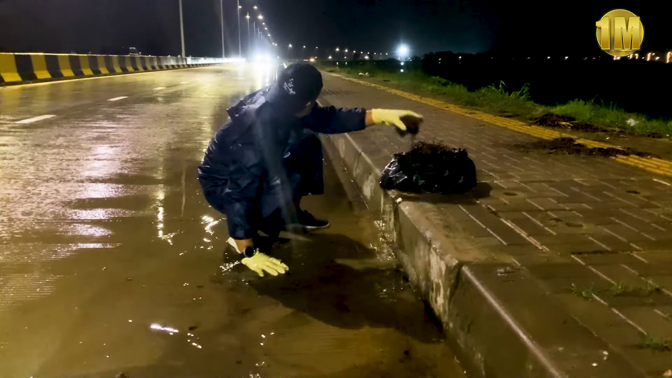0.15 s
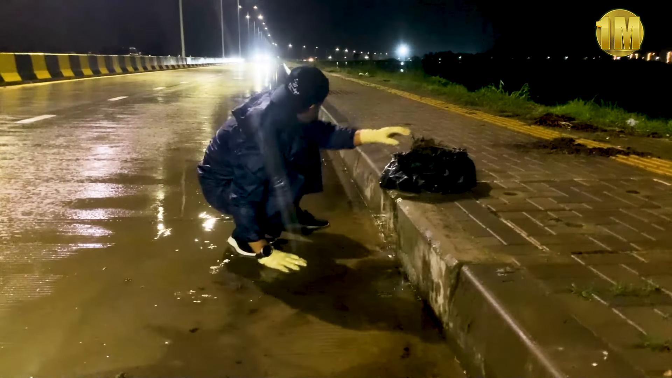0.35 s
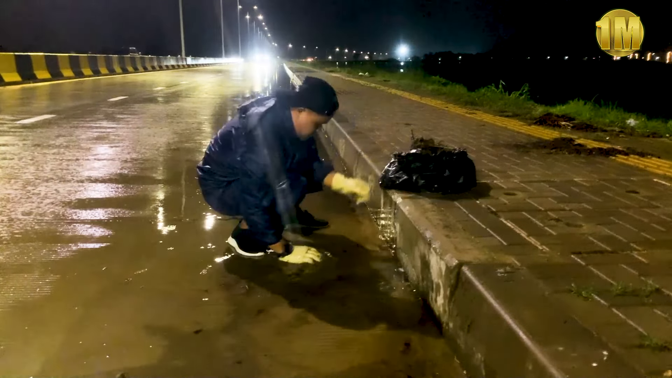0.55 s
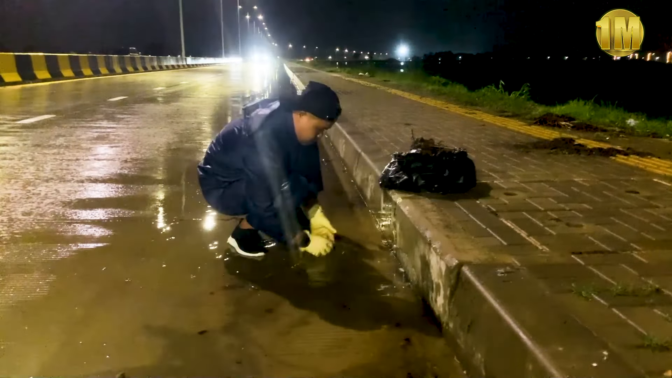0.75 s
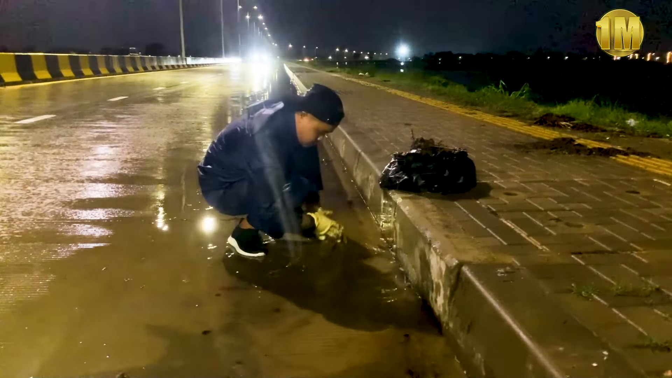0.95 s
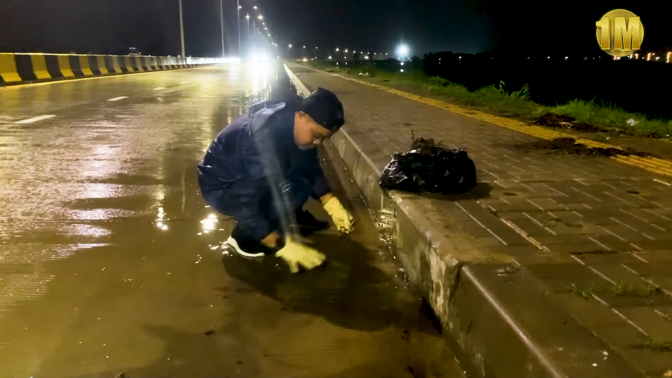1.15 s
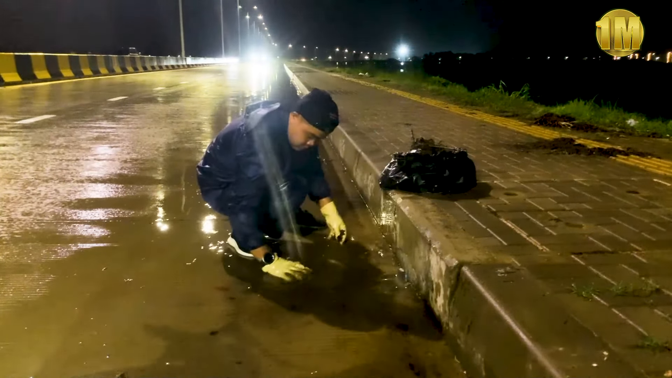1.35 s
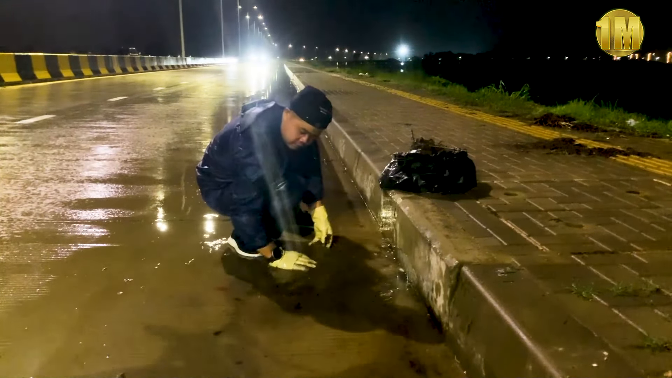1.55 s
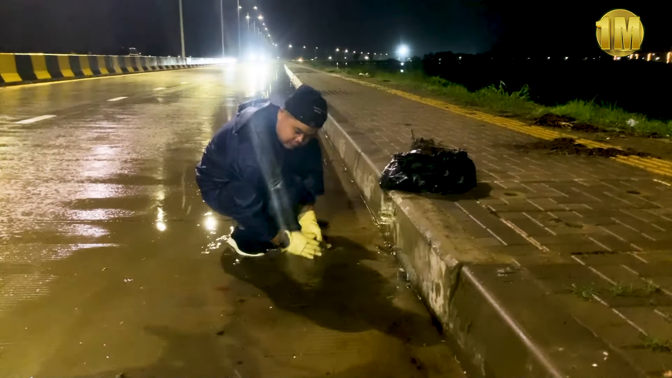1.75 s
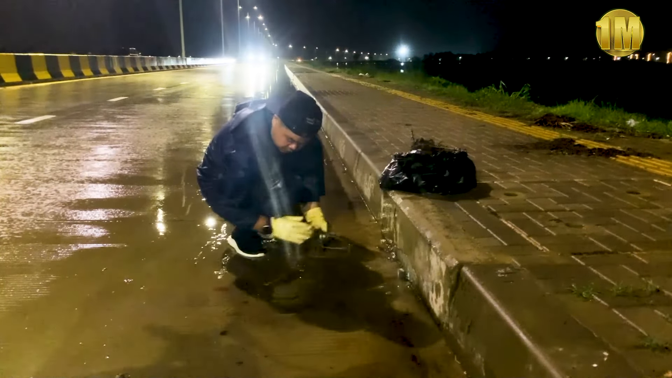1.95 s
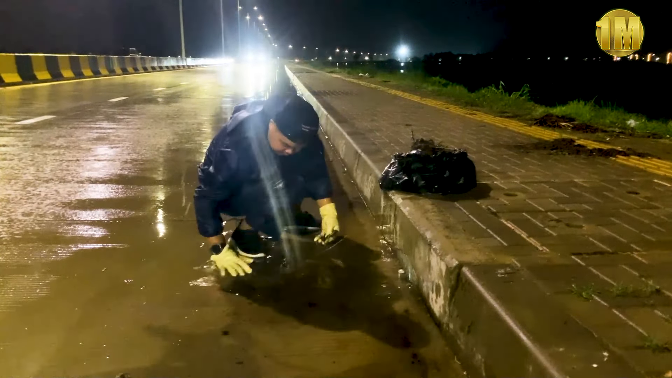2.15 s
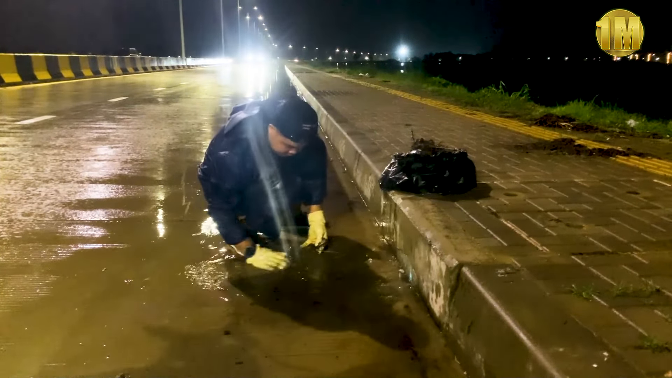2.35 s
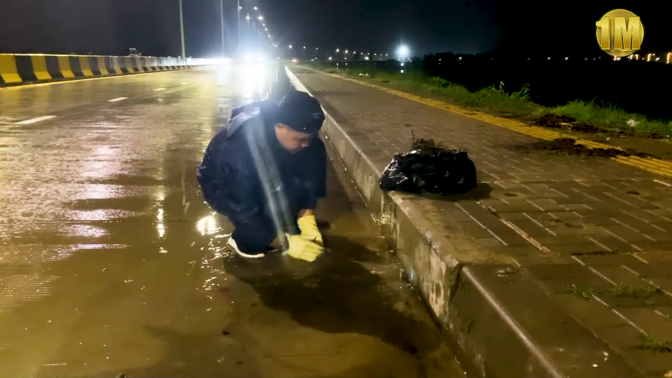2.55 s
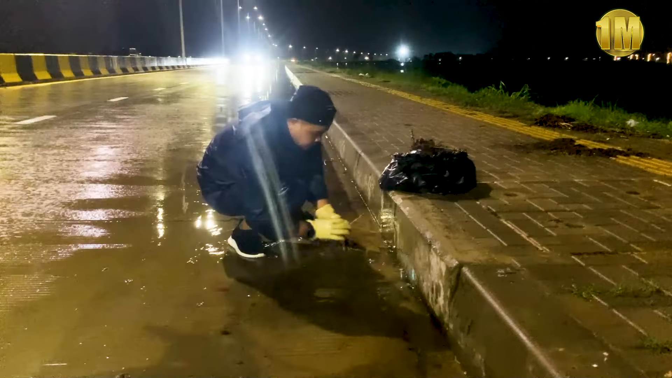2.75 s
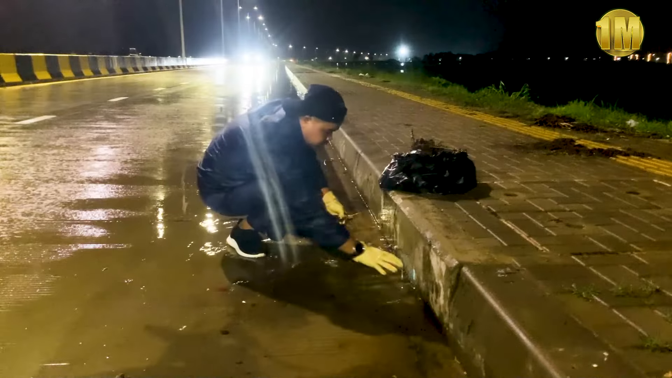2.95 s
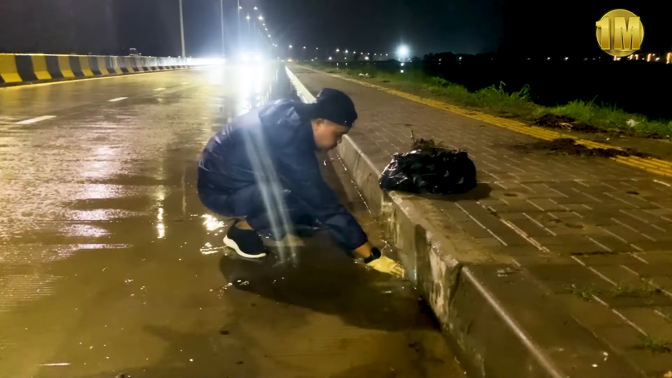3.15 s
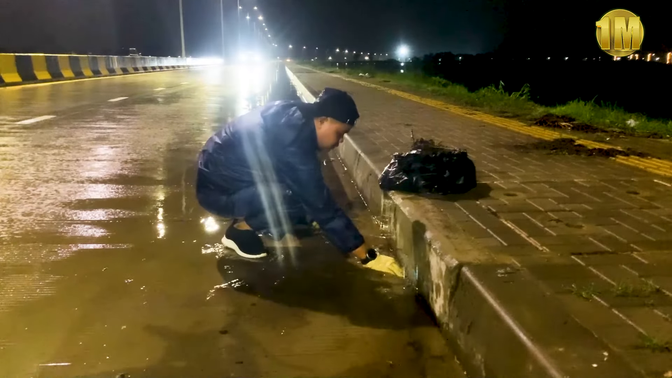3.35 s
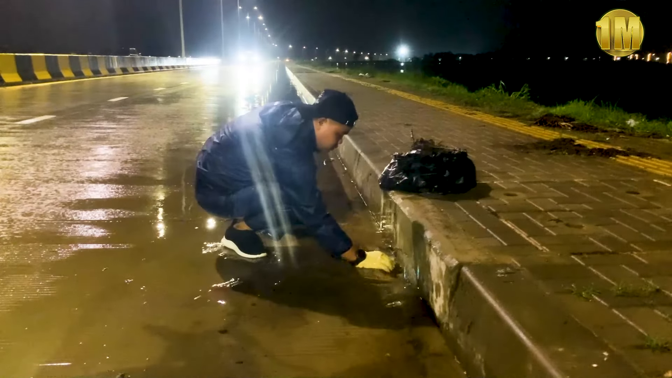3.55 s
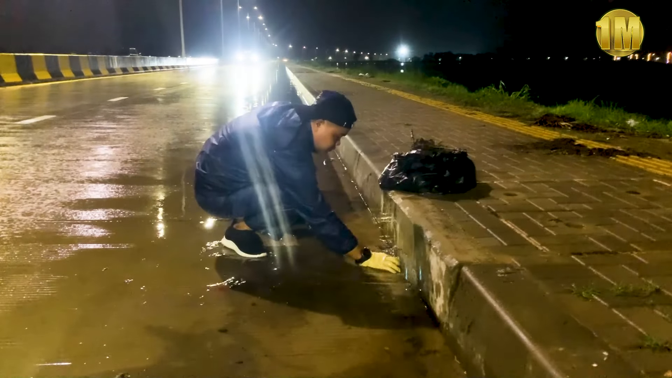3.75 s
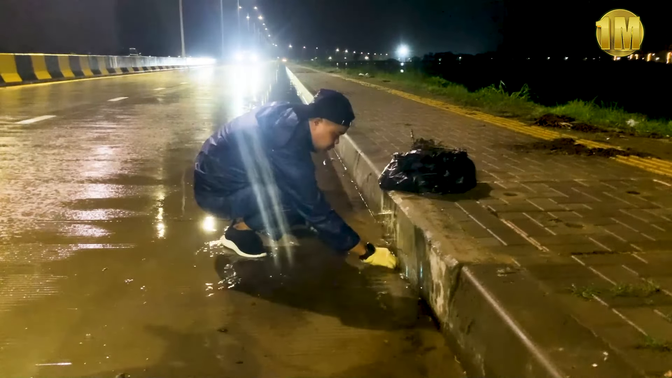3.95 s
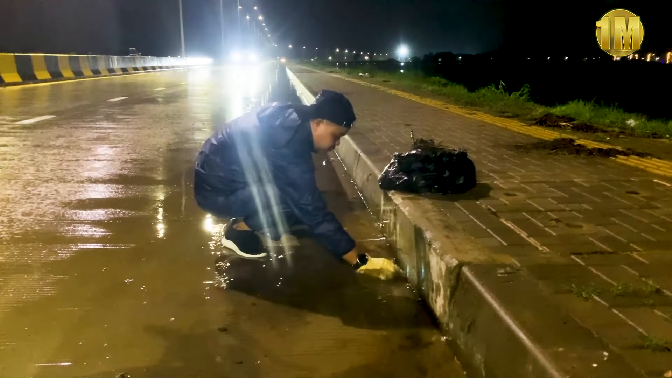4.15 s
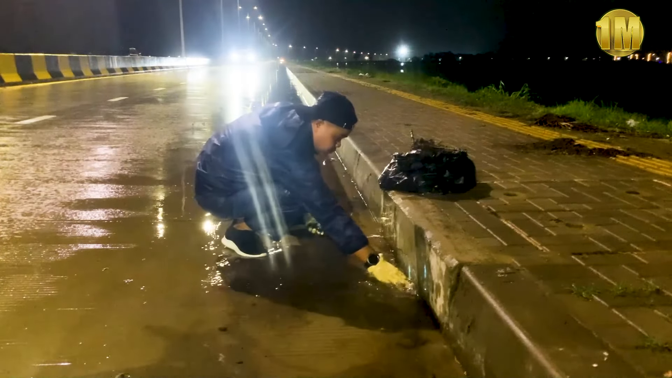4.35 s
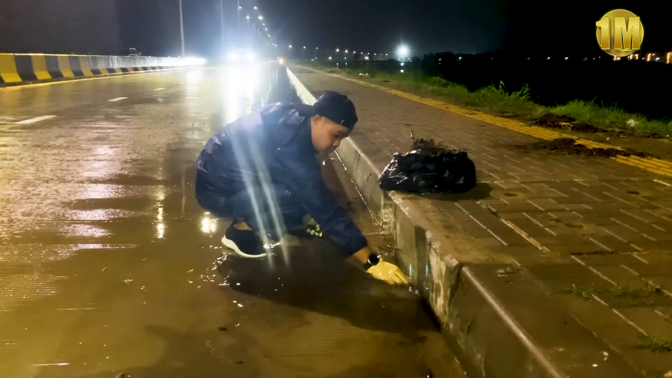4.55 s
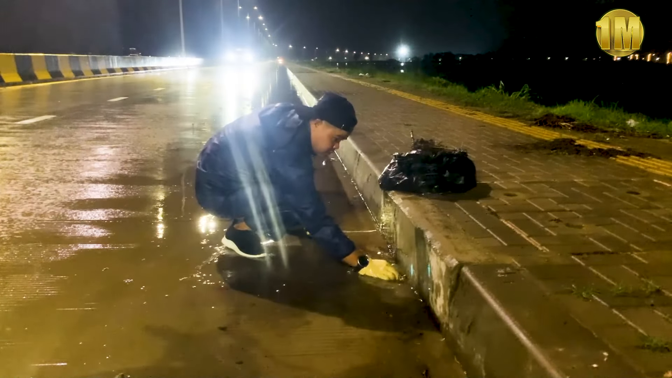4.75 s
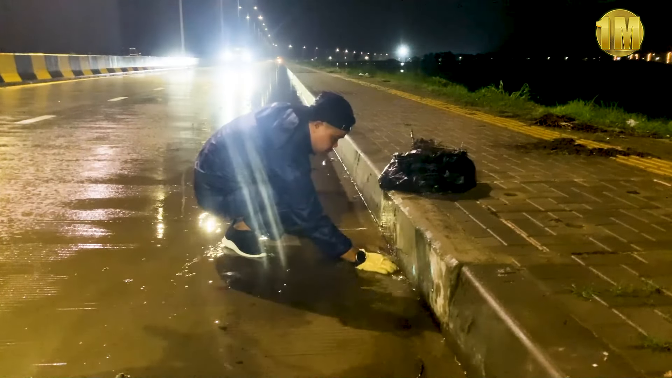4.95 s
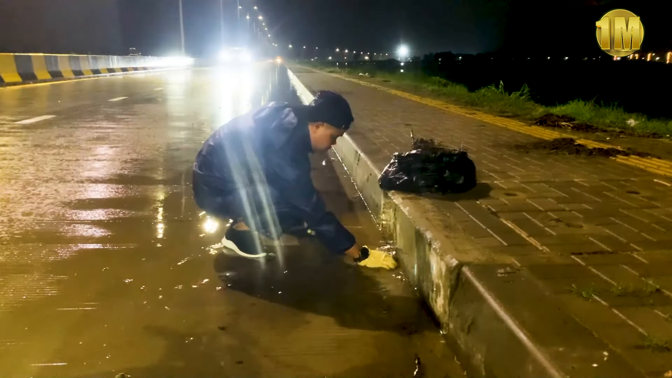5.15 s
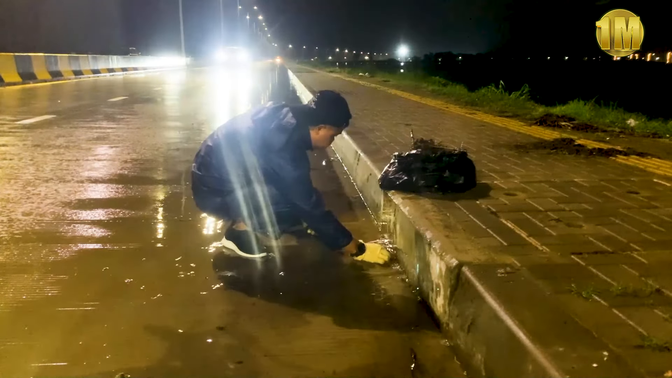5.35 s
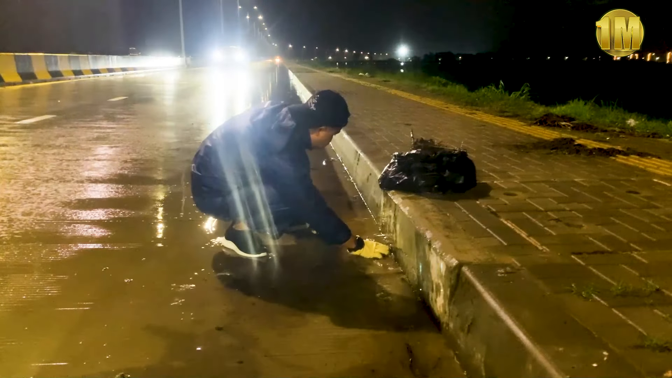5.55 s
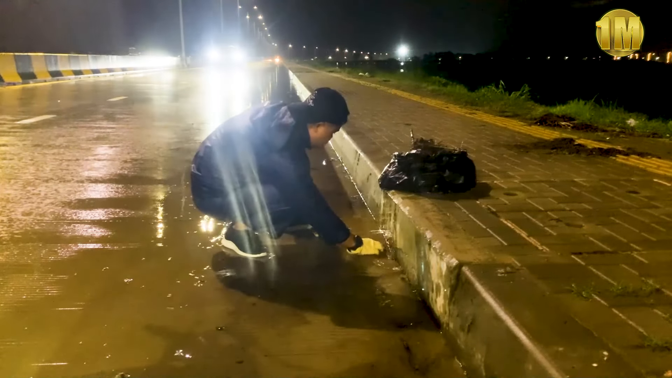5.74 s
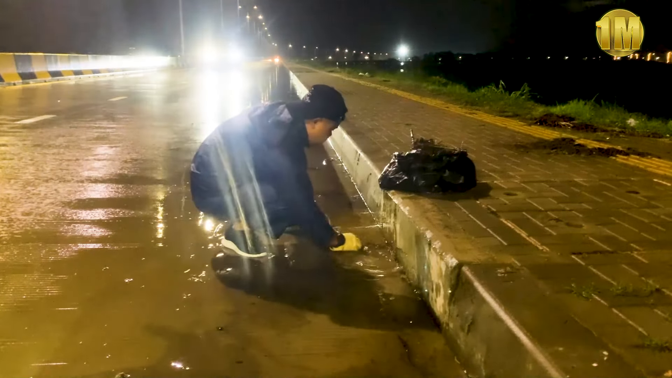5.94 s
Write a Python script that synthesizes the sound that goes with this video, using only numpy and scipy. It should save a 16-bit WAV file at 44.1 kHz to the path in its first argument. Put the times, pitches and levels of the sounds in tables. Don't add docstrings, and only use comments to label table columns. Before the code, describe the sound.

Outdoors on a wet roadside at night, a far engine hum sags and fades as another car's deep throbbing rumble stays low, then swells strongly after four seconds. Close to the microphone, grit clicks, drips, soft cloth rubs and dull drain knocks come irregularly, one knock standing out before the car grows loud. Thin tyre hiss and spray lie beneath. Stereo pickup is slightly ragged from noise reduction.

```python
import sys
import numpy as np
from scipy import signal
from scipy.fft import rfft, irfft, next_fast_len
from scipy.io import wavfile
from scipy.ndimage import uniform_filter1d, map_coordinates

SR = 44100
rng = np.random.default_rng(int(sys.argv[2]) if len(sys.argv) > 2 else 0)


def to_wav(sig):
    pcm = np.clip(np.atleast_2d(sig), -1, 1) * 32767
    pcm = np.round(pcm).astype(np.int16)
    wavfile.write(sys.argv[1], SR, pcm.T)


def amplitude_ratio(level_db):
    exponent = np.asarray(level_db, float) / 20
    return 10 ** exponent


N = 268683


def unit(x):
    return x / np.sqrt(np.mean(x ** 2) + 1e-20)


def along(points, hz):
    f, v = np.transpose(points)
    return np.interp(np.log(hz + 1), np.log(f + 1), v)


def wobble(rate):
    return map_coordinates(rng.standard_normal(800), [np.arange(N) * min(rate, 120) / SR])


def filtered(x, response):
    m = next_fast_len(N + 8192)
    return irfft(rfft(x, m) * response(np.fft.rfftfreq(m, 1 / SR)), m)[..., :N]


# (frequency [Hz], common share [0-1])
ALIKE = [(60, .97), (350, .92), (540, .74), (700, .85), (900, .6), (1500, .9), (1700, .65), (2400, .88),
         (2650, .55), (2900, .85), (3250, .7), (3600, .33), (11500, .3), (13000, .95)]


def rush(spectrum, patchy_db):
    z = signal.stft(rng.standard_normal((2, N)), nperseg=512)[2]
    field = uniform_filter1d(rng.standard_normal(z.shape[1:]), size=5, axis=0)
    field = uniform_filter1d(field, size=12, axis=1)
    pair = signal.istft(z * amplitude_ratio(patchy_db * unit(field)), nperseg=512)[1][:, :N]

    def split(hz):
        angle = np.arccos(np.clip(along(ALIKE, hz), 0, 1)) / 2
        return amplitude_ratio(along(spectrum, hz)) * [np.cos(angle), np.sin(angle)]

    common, diffuse = filtered(pair, split)
    return unit(np.array([common + diffuse, common - diffuse]))


# (time [s], level [dB])
CAR = [(0, -33.5), (.4, -38.5), (1.5, -39.5), (2.4, -38), (3.1, -37.5), (3.8, -37), (4.3, -33),
       (4.7, -29.5), (5.1, -29.5), (5.4, -22), (5.8, -24.5), (6.09, -27.5)]


def nearness():
    far_db = -39
    s, level_db = np.transpose(CAR)
    return np.interp(np.arange(N) / SR, s, level_db) - far_db


# (frequency [Hz], density [dB per Hz])
BOOM = [(35, -120), (52, -37), (66, 3.2), (80, -1), (100, -0.5), (125, -2.5), (165, -13), (230, -24.5),
        (400, -120)]
# (frequency [Hz], density [dB per Hz])
GROWL = [(60, -120), (110, -29), (165, 1), (250, -6), (340, -11.5), (430, -24), (540, -33), (900, -120)]
# (frequency [Hz], density [dB per Hz])
GROUND = [(18, -64), (30, -35), (40, -24), (52, -12.5), (62, -12.5), (80, -10.5), (120, -120)]
# (frequency [Hz], density [dB per Hz])
WHINE = [(900, -120), (1150, -33), (1270, 12), (1330, 10.5), (1700, -120)]
# (time [s], half length [s], boom change
# [dB], growl change [dB])
JOLTS = [(0.143, 0.065, -12.5, -4.5), (0.28, .05, -3.5, 4.5), (.58, 0.024, 4, 3), (1.31, 0.044, 0.5, 3),
         (1.785, 0.043, -4, -0.5), (2.01, 0.033, 3, .1), (2.883, 0.033, 2, -1.5), (3.03, 0.01, 0, 1),
         (3.774, 0.022, 4, 0.6), (4.346, 0.024, 4.5, 5), (4.563, 0.12, 2.5, 0.5), (4.73, 0.03, 2.5, -1.5),
         (4.966, 0.025, 5.5, 3), (5.148, 0.02, -3.5, 0.5), (5.186, 0.015, 7.5, -4), (5.23, 0.028, 3, 0.5),
         (5.26, 0.041, 1.8, 3), (5.5, 0.024, 0, 0.5), (5.631, 0.033, -10, -8), (5.673, 0.009, 8, -11),
         (5.802, .04, 4.5, -3.5), (5.902, 0.043, -10, -0.7)]
BOOM_DB, GROWL_DB, GROUND_DB = -41, -44.5, -47
BOOM_GROWS, GROWL_GROWS, GROUND_GROWS = 1.036, 0.86, 0.47
WHINE_DB, WHINE_FROM_S, WHINE_RISE_S = -63, 0.68, 1


def car():
    near_db, t = nearness(), np.arange(N) / SR
    boom_jolt_db, growl_jolt_db = sum(
        np.outer([boom, growl], np.exp(-.5 * ((t - s) / length) ** 2)) for s, length, boom, growl in JOLTS)
    throb = wobble(18)
    boom_db = BOOM_DB + BOOM_GROWS * near_db + boom_jolt_db + 0.48 * throb
    growl_db = GROWL_DB + GROWL_GROWS * near_db + growl_jolt_db - 2.5 + 0.72 * throb
    ground_db = GROUND_DB + GROUND_GROWS * near_db + 3.5 + 0.82 * wobble(2.62)
    whine_db = WHINE_DB - 22 * np.clip(1 - (t - WHINE_FROM_S) / WHINE_RISE_S, 0, 1)
    whine_db = whine_db - 3.5 + 2.9 * wobble(3.87)
    boom = amplitude_ratio(boom_db) * rush(BOOM, patchy_db=-1.3)
    growl = amplitude_ratio(growl_db) * rush(GROWL, patchy_db=1.77)
    ground = amplitude_ratio(ground_db) * rush(GROUND, patchy_db=2.5)
    whine = amplitude_ratio(whine_db) * rush(WHINE, patchy_db=-1.5)
    return boom + growl + ground + whine


# (frequency [Hz], density [dB per Hz])
TYRES = [(250, -120), (400, 6.5), (520, 2), (650, 4.5), (800, -6), (950, -9), (1150, -6), (1300, -16),
         (1550, -6), (1700, -11), (1900, -6.5), (2150, -15.5), (2700, -23.5), (4500, -120)]
# (frequency [Hz], density [dB per Hz])
SPRAY = [(1500, -120), (2500, -1), (3300, -2), (4100, -5), (5100, -7.5), (6400, -1.5), (7500, -3.5),
         (9000, -6), (10500, -14.5), (12000, -20), (15200, -25), (15500, -62), (16000, -120)]
ROAR_DB, SPRAY_DB = -56.5, -61.5
ROAR_GROWS, SPRAY_GROWS = 0.23, 0.1
LEAVING_DB, LEAVING_S = 1.5, 0.05


def road():
    near_db, t = nearness(), np.arange(N) / SR
    roar_db = ROAR_DB + ROAR_GROWS * near_db + LEAVING_DB * np.exp(-t / LEAVING_S)
    roar = amplitude_ratio(roar_db + 1.5 + 0.56 * wobble(7)) * rush(TYRES, patchy_db=1.5)
    droplets = (rng.random(N) < 60 / SR) * amplitude_ratio(0.9 * rng.exponential(size=N))
    droplet_s = 0.0031
    sparkle = 1 + 0.5 * signal.lfilter([1], [1, -np.exp(-1 / (droplet_s * SR))], droplets)
    spray = filtered(sparkle * rush(SPRAY, patchy_db=1.1), lambda hz: hz < 15300)
    spray_db = SPRAY_DB + SPRAY_GROWS * near_db + .45 * wobble(6.3)
    return roar + amplitude_ratio(spray_db) * unit(spray)


# (middle time [s], length [s], level [dB], centre frequency [Hz], low hump level [dB])
SWISH = [
    (0.515, 0.069, -59, 7100, -5),
    (0.995, 0.054, -57.5, 7000, -6),
    (1.789, 0.0092, -59.5, 7400, -14),
    (1.903, 0.038, -54, 6940, 1),
    (2.034, 0.073, -62, 6940, -3),
    (2.469, 0.016, -57.5, 5100, 8),
    (2.718, 0.063, -52, 6460, -2),
    (4.292, 0.014, -59, 6430, 11),
    (5.998, 0.19, -59, 6500, 1),
]


def swishes():
    out, t = np.zeros((2, N)), np.arange(N) / SR

    def hump(hz, centre_hz, octaves):
        return np.exp(-.5 * (np.log2((hz + 1) / centre_hz) / octaves) ** 2)

    for s, length, db, centre_hz, low_db in SWISH:
        rub = rng.standard_normal(N) + 0.47 * rng.standard_normal((2, N))
        rub = filtered(rub, lambda hz: hump(hz, centre_hz, 0.34) + amplitude_ratio(low_db) * hump(hz, 2820, 0.27))
        grain_db = 2.3 * wobble(60) + 1.08 * wobble(118)
        out += amplitude_ratio(db + grain_db) * np.exp(-.5 * ((t - s) / length) ** 2) * unit(rub)
    return out


# (time [s], peak level [dB], ring frequency [Hz], snap share [0-1], left over right [dB])
TICKS = [(0.0316, -44, 7640, 0.53, 4), (0.0687, -38, 8040, 0.24, 6), (.1264, -44, 4100, 0.16, 2),
         (1.246, -51, 6510, 1, -8), (1.8535, -51, 6240, 0.1, 6), (2.0322, -40.5, 6170, .35, 4),
         (2.1277, -37, 4820, 0.5, -6), (2.16, -54, 4040, 0.9, 1), (2.232, -41, 6400, 0.3, 1),
         (2.355, -54, 2280, .6, 5), (2.5504, -46, 6280, 0.5, 3), (3.0853, -37.5, 6440, 0.4, 8),
         (3.632, -50.5, 6330, .75, -11), (3.7456, -37, 6500, 0.54, -19), (4.352, -42, 9100, 0.85, -19),
         (5.069, -44, 2370, 0.44, -2), (5.457, -53, 2360, .5, -3)]
# (time [s], peak level [dB], ring frequency [Hz])
DRIPS = [(0.097, -44, 6330), (.957, -57, 2270), (1.283, -43.5, 2540), (1.3853, -47, 7700),
         (1.6018, -50, 2010), (1.779, -52, 3900), (1.8868, -40, 2470), (2.0837, -47, 6330),
         (2.195, -47, 8200), (2.391, -45.5, 5850), (2.4687, -35, 5250), (2.4884, -44, 6400),
         (3.102, -43, 7900), (3.4567, -50, 2310), (3.459, -45, 6300), (4.269, -47, 2300),
         (4.354, -41, 2300), (4.414, -45, 1930), (4.448, -47, 2040), (4.749, -49, 6200),
         (5.0685, -42.5, 5050), (5.23, -51, 6330)]
# (frequency [Hz], level [dB])
SNAP = [(800, -38), (2500, -12), (9000, 10.5), (11500, 2), (14000, -7), (16500, -16), (17000, -120)]
DRIP_SNAP, DRIP_PAN_DB = 0.054, 3.5
LOUD_DB = -41.5
RING_S, RING_RISE_S = 0.013, 0.001


def ticks():
    out, t = np.zeros((2, 2, N + SR)), np.arange(SR // 50) / SR
    lead_in = 40
    since_hit = t - t[lead_in]
    colour = amplitude_ratio(along(SNAP, np.fft.rfftfreq(len(t), 1 / SR)))
    for s, db, hz, snap, pan_db in TICKS + [(s, db, hz, DRIP_SNAP, DRIP_PAN_DB) for s, db, hz in DRIPS]:
        snap = np.clip(snap, 0, 1)
        sides = amplitude_ratio(db + np.array([[.3], [-.3]]) * pan_db)
        burst = 2.5 * (since_hit == 0) + .5 * rng.standard_normal(len(t))
        burst = burst * (since_hit >= 0) * amplitude_ratio(-60 * since_hit / .003)
        crack = irfft(rfft(burst) * colour)
        fade = amplitude_ratio(-60 * t / (RING_S * (1 - 0.76 * snap)))
        rise = 1 - np.exp(-t / (RING_RISE_S * (1.05 - snap)))
        ring = np.roll(np.sin(2 * np.pi * hz * t) * fade * rise, shift=lead_in)
        sound = sides * (snap * 1.4 * crack + (1 - snap) * 1.5 * ring)
        reaches_top = int(db > LOUD_DB and pan_db < 0)
        out[reaches_top, :, round(s * SR) - lead_in:][:, :len(t)] += sound
    plain, topped = out[..., :N]
    return filtered(plain, lambda hz: hz < 15000) + filtered(topped, lambda hz: hz < 16600)


# (time [s], peak level [dB], low frequency [Hz], high frequency [Hz], left over right [dB])
KNOCKS = [(0.398, -41, 403, 880, -12), (0.93, -39, 390, 770, -3), (1.246, -34, 457, 1450, -4),
          (2.128, -39, 755, 945, -9.5), (3.746, -20, 750, 1350, -1.5), (3.7475, -37, 540, 1090, -14),
          (4.299, -40, 514, 1300, -8), (5.071, -29.5, 900, 1220, -6), (5.402, -32, 845, 1520, -1),
          (5.439, -39, 790, 996, -1), (5.456, -47, 1000, 1220, -12), (5.693, -28, 780, 1490, 3),
          (5.994, -31, 750, 860, -3), (6.049, -35, 1500, 1900, -7)]
DEEP_KNOCK_HZ = 520
DEEP_LATE_MS, HIGH_LATE_MS = 0.98, 0.13
KNOCK_CYCLES, KNOCK_RISE_S = 10, .0018


def knocks():
    out, t = np.zeros((2, N + SR)), np.arange(SR // 10) / SR
    for s, db, low_hz, high_hz, pan_db in KNOCKS:
        late_ms = DEEP_LATE_MS if low_hz < DEEP_KNOCK_HZ else HIGH_LATE_MS
        modes = np.sin(2 * np.pi * low_hz * t) + amplitude_ratio(-9.5) * np.sin(2 * np.pi * high_hz * t)
        band = signal.butter(2, [.8 * low_hz, 1.2 * high_hz], "band", fs=SR)
        thud = unit(signal.lfilter(*band, rng.standard_normal(len(t))))
        fade = amplitude_ratio(db + 3 - 60 * t * low_hz / KNOCK_CYCLES) * (1 - np.exp(-t / KNOCK_RISE_S))
        blow = fade * (modes + .3 * thud)
        out[0, round((s + late_ms / 1000) * SR):][:len(t)] += amplitude_ratio(pan_db / 2) * blow
        out[1, round(s * SR):][:len(t)] += amplitude_ratio(-pan_db / 2) * blow
    return out[:, :N]


# (multiple of its turning rate [-], level [dB])
FAR_ORDERS = [
    (3, -0.5),
    (4, 2),
]
FAR_HZ, FAR_SAG_HZ_PER_S2 = 62.34, 1.2
FAR_DB, FAR_HOLD_S, FAR_FADE_DB_PER_S = -48, 1.21, 13


def far_engine():
    t = np.arange(N) / SR
    far_db = FAR_DB - FAR_FADE_DB_PER_S * np.maximum(t - FAR_HOLD_S, 0)
    turning_hz = FAR_HZ - FAR_SAG_HZ_PER_S2 * np.minimum(t, 2.5) ** 2 + 0.31 * wobble(4.91)
    phase = 2 * np.pi * np.cumsum(turning_hz) / SR
    return sum(amplitude_ratio(far_db + db + 2.0 + .6 * wobble(7.14)) * np.sin(k * phase) for k, db in FAR_ORDERS)


LAMP_HZ, LAMP_DB, LAMP_FLICKER_DB = 791.3, -63.5, 5
LAMP_SWELL_DB, LAMP_SWELL_S, LAMP_SWELL_HALF_S = 4, 2.38, 0.93


def street_lamp():
    t = np.arange(N) / SR
    swell_db = LAMP_SWELL_DB * np.exp(-((t - LAMP_SWELL_S) / LAMP_SWELL_HALF_S) ** 4)
    phase = 2 * np.pi * np.cumsum(LAMP_HZ + 4.4 * wobble(25)) / SR
    return amplitude_ratio(LAMP_DB + swell_db + LAMP_FLICKER_DB * wobble(13)) * np.sin(phase)


# (delay [s], level [dB])
KERB = [
    (.0007, -8),
    (.0016, -15),
]
# (frequency [Hz], added phase [radians])
LEAD_HIGH = [(3400, 0), (3900, 3.7), (4600, 3.7), (8000, 29), (8600, 26.5), (11000, 29.3), (12500, 28),
             (13000, 25), (14100, 25), (14600, 28.3)]


def scene():
    near = ticks() + knocks()
    near = near + filtered(near, lambda hz: sum(amplitude_ratio(db) * np.exp(-2j * np.pi * hz * s) for s, db in KERB))

    def port_phases(hz):
        treble = np.maximum(along(LEAD_HIGH, hz) - 3.7, 0)
        low_mids = 1.9 * np.exp(-(np.log((hz + 1) / 590) / .28) ** 2)
        return np.exp(1j * np.outer([0, 1], treble - low_mids))

    near = filtered(near, port_phases)
    return car() + road() + swishes() + near + far_engine() + street_lamp()


# (frequency [Hz], threshold against the typical level [dB])
SQUELCH = [(500, -31), (1200, -12), (2000, -7.5), (3000, -9), (4200, -5), (6300, -28), (9000, -15),
           (11000, -3.5), (13000, -19)]


def squelch(ports):
    pair = np.array([ports[0] + ports[1], ports[0] - ports[1]]) / 2
    hz, _, z = signal.stft(pair, SR, nperseg=1024)
    level = np.log(uniform_filter1d(np.abs(z) ** 2, size=3, axis=1) + 1e-20)
    typical = uniform_filter1d(uniform_filter1d(level, size=11, axis=1), size=41, axis=2)
    ratio = np.exp(2 * np.clip(level - typical, -20, 20)) / amplitude_ratio(4 * along(SQUELCH, hz))[:, None]
    mid, side = signal.istft(z * ratio / (1 + ratio), SR, nperseg=1024)[1][:, :N]
    return np.array([mid + side, mid - side])


def top_cut(x):
    return signal.sosfilt(signal.butter(12, 16670, fs=SR, output="sos"), x)


# (frequency [Hz], width [Hz], level [dB])
CASE = [(1380, 12, 8), (1466, 78, 5.5), (1783, 410, 4.5), (2280, 140, 10.5), (2300, 29, -6), (4074, 103, 9),
        (4570, 360, 6), (5480, 21, 10.5), (6330, 140, 3.5), (6400, 130, 3.5), (7400, 510, 4)]
# (frequency [Hz], left over right [dB])
TILT = [(50, -3), (130, -3.5), (260, 0), (1500, -1), (2200, 0), (4500, 1.5), (5100, 2.5), (6500, 7.5),
        (8100, 3.5), (9700, -5.5), (10800, -10), (12500, -1.5)]
# (frequency [Hz], phase [radians])
LEAD = [(40, -1), (170, -.75), (260, 0), (516, 3), (690, 5.9), (800, 8.4), (960, 7.7), (1150, 8.9),
        (1300, 11.3), (1480, 12.3), (1680, 11.3), (2500, 11.9), (2750, 9.5), (3400, 9.5)]


def record(dry):
    def port_response(hz):
        case_db = sum(db / (1 + (2 * (hz - c) / width) ** 2) for c, width, db in CASE)
        tilt_db = np.array([[.5], [-.5]]) * along(TILT, hz)
        lag = np.array([[0], [-1j]]) * (along(LEAD, hz) + along(LEAD_HIGH, hz))
        return amplitude_ratio(case_db + tilt_db) * np.exp(lag)

    soft_ends = signal.windows.tukey(N, .006 * SR / N)
    ports = filtered(dry * soft_ends, port_response)
    mix = squelch(ports) * soft_ends
    return top_cut(mix)


dry = scene()
out = record(dry)
to_wav(out)
```